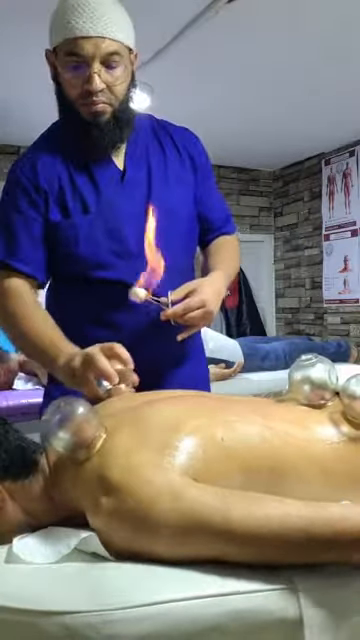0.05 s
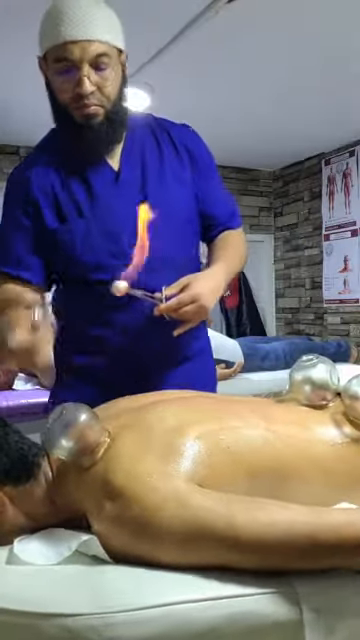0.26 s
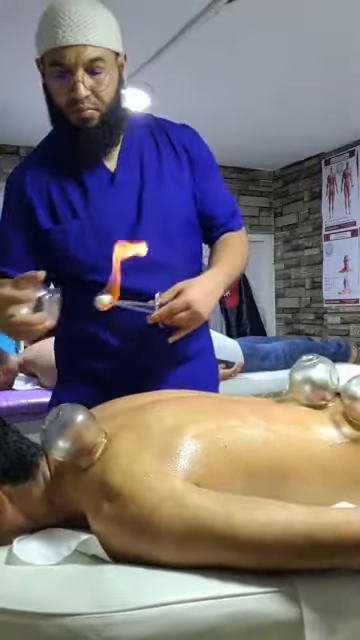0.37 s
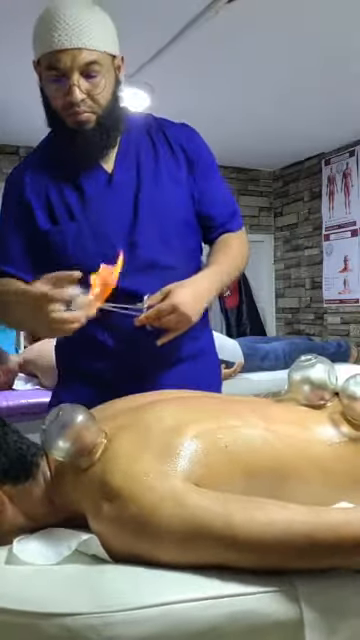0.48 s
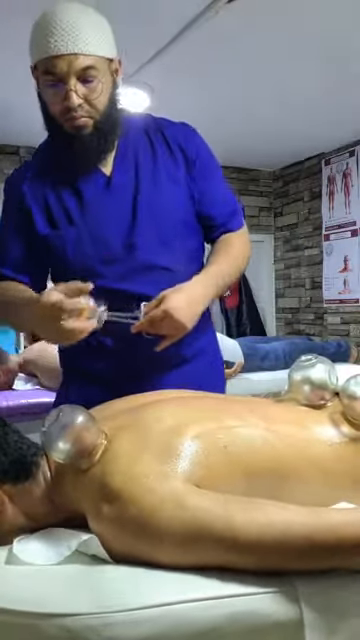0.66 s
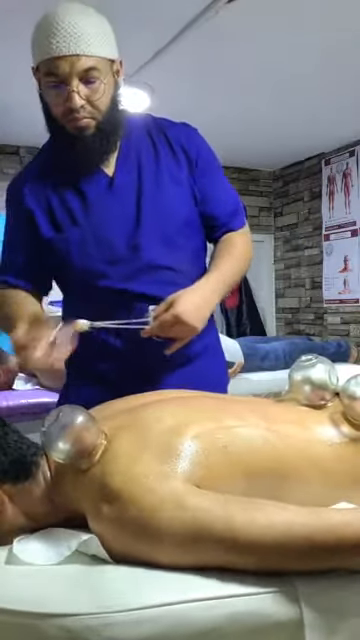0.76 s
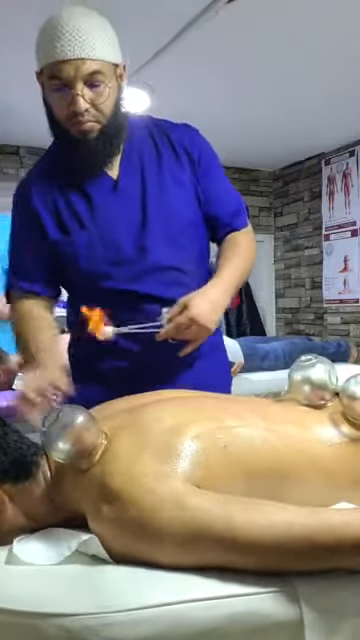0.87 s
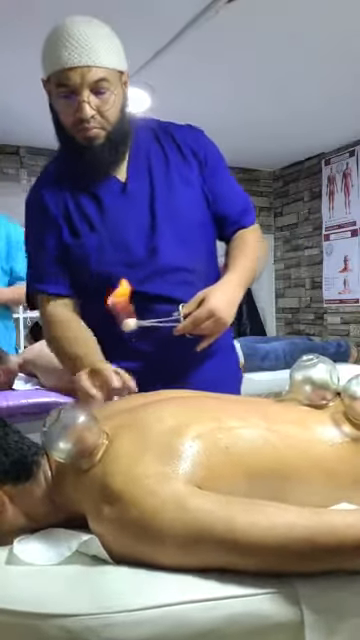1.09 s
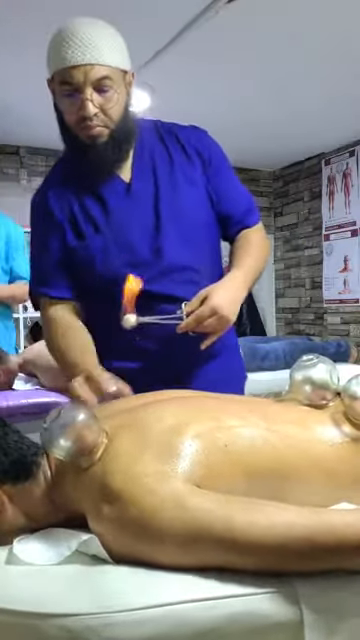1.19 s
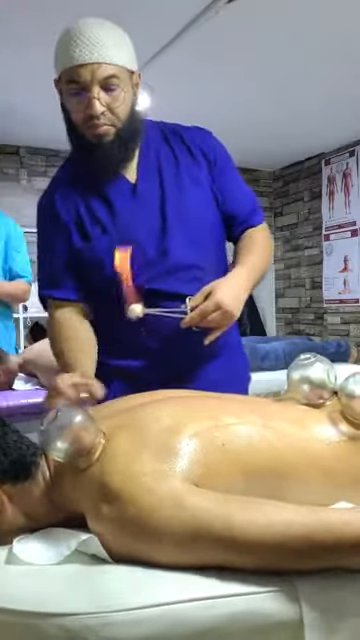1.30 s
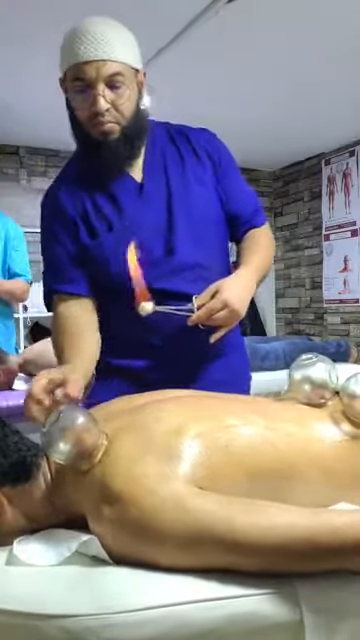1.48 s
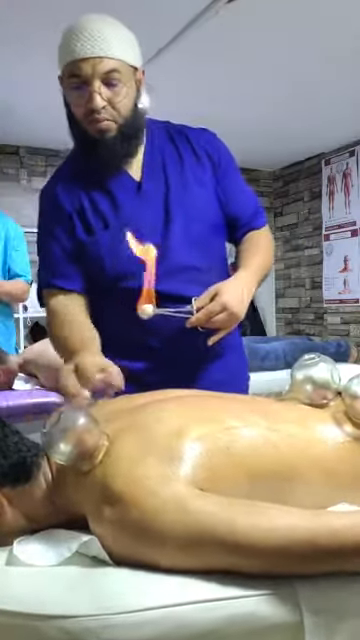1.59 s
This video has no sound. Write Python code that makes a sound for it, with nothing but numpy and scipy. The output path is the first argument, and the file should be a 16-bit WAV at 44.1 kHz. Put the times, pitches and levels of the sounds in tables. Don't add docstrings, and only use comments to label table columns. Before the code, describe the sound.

Suction cup released from skin: short airy pop with a quick rising note, then a tiny bright clink

```python
import sys
import numpy as np
from scipy import signal
from scipy.fft import rfft, irfft
from scipy.io import wavfile
from scipy.ndimage import uniform_filter1d

SR = 44100
rng = np.random.default_rng(int(sys.argv[2]) if len(sys.argv) > 2 else 0)


def convert_level_to_amplitude(level_db):
    exponent = np.asarray(level_db, float) / 20
    return 10 ** exponent


def pcm_store(signal):
    levels = np.round(np.clip(np.atleast_2d(signal), -1, 1) * 32767)
    wavfile.write(sys.argv[1], SR, levels.astype(np.int16).T)


N = 72765
T = np.arange(N) / SR
HZ = np.fft.rfftfreq(N, 1 / SR)

# delay/s, left level/dB, right level/dB
ECHOES = [
    (.0055, -14.5, -15),
    (.011, -3, -20),
    (.0165, -14, -4.5),
    (.021, -7, -6),
    (.03, -9.5, -8),
    (.049, -14, -10),
    (.058, -17.5, -7.5),
]
# f/Hz, T60/s
ROOM_T60 = [(60, 0.2), (200, 0.45), (600, .27), (1500, 0.24), (5000, 0.26), (12000, .22)]
# f/Hz, level/dB, T60/s
ROOM_MODES = [(66, -9, .6), (172, 1, .25), (221, -3, .38), (279, -3, .26), (382, -6, .22), (417, -6, .26),
              (560, -5, .27)]
# t/s, level/dB
ROOM_TONE_LEVEL = [(0.0, -57.5), (0.196, -54), (0.326, -47), (0.386, -52.5), (0.67, -71.5), (0.978, -76.5),
                   (1.138, -80), (1.388, -88), (1.65, -68)]
# f/Hz, level/dB
ROOM_TONE_COLOUR = [(15, -32.5), (25, -11), (63, -4.5), (190, -17), (427, -27), (503, -17.5), (1400, -35),
                    (8140, -40), (16000, -59)]
# t/s, level/dB, f/Hz
LOW_THROBS = [(0, -57, 64), (0.071, -49, 64), (0.142, -54, 66), (0.212, -32.5, 70), (0.272, -31.5, 67),
              (0.357, -37.5, 60), (.435, -58.5, 67), (0.512, -48, 66), (0.611, -48.5, 67),
              (0.687, -51, 65), (0.811, -55, 59), (.925, -45, 60), (1.029, -44, 70),
              (1.072, -47.5, 66.85), (1.14, -49.5, 64), (1.199, -51, 57.6), (1.28, -51, 61.7),
              (1.38, -64.5, 57.7), (1.478, -49.5, 61.3), (1.535, -44, 64.63), (1.619, -49, 55)]
# f/Hz, level/dB
CLOTH_COLOUR = [(200, -34), (500, -15.5), (920, -13.5), (1150, -5), (1730, -2), (8100, -9.5), (10000, -18),
                (15500, -21.5)]
# peak t/s, level/dB, rise/s, fall/s, tilt/(dB per octave)
RUSTLES = [(.0, -77, .01, 0.064, -2.5), (0.058, -48.5, 0.0026, 0.03, 5), (0.156, -42, 0.0014, 0.1, 1.5),
           (0.401, -48.5, 0.0028, 0.035, 2.5), (.44, -40.5, 0.027, 0.027, -4),
           (0.568, -56.5, 0.00245, 0.051, 7), (.632, -46, 0.0057, 0.038, -3.5), (.625, -60, .003, .03, 5),
           (.92, -79.5, 0.018, 0.041, -20.5), (1.15, -71.5, 0.06163, .1, 0.5),
           (1.37, -57.5, 0.0679, 0.079, -0.5), (1.442, -49, 0.06, 0.083, 0.5),
           (1.508, -51, 0.099, 0.064, -0.5), (1.452, -56, 0.0011, 0.0037, 15)]
# t/s, level/dB, contact/s
THUDS = [(.05, -41, .003), (0.299, -38.5, 0.0051), (0.601, -46.5, 0.0038), (0.672, -50.5, .003),
         (.885, -56, 0.0024), (.915, -48.5, .0012), (0.9978, -31, 0.0016), (1.011, -31, .0024),
         (1.023, -35.5, .0024), (1.095, -39.5, .0024), (1.52, -56, 0.0017)]
# f/Hz, level/dB, T60/s
TONGS_MODES = [(7378, 0, .12), (7390, -16.5, .2), (7760, -12.5, 0.084), (8060, -14, 0.069),
               (6640, -19, 0.024), (887, -18.5, 0.1)]
# f/Hz, level/dB, T60/s
GLASS_MODES = [(2393, -5, .15), (3891, -7.5, .17), (5130, -6, .19), (5787, -3, 0.11), (6608, -8, 0.29),
               (7070, -4.5, 0.26), (7327, -2.5, 0.15), (8300, -11.5, .25)]
# f/Hz, width/Hz, level/dB
JET_RESONANCES = [(1390, 380, -5.5), (2454, 210, 0), (3544, 230, -8.5), (5132, 640, -0.5), (5900, 210, -2),
                  (7300, 640, -5), (8700, 540, 0), (10050, 1200, -11.5), (12152, 800, -6.5),
                  (14500, 1800, -13.5)]

ALIKE_HZ = 270
ROOM_BASS_HZ = 209.9
TICK_S = .6185
SEAL_OPENS_S, POP_S, NOTE_S = .195, .2040, .2071


def curve(table, x, log=False):
    points = np.array(table, float)
    if log:
        return np.interp(np.log(x + 1), np.log(points[:, 0]), points[:, 1])
    return np.interp(x, points[:, 0], points[:, 1])


def unit(x):
    return x / np.sqrt(np.mean(x ** 2))


def noise(gain):
    mid, side = rfft(rng.standard_normal((2, N)))
    side = side * HZ ** 4 / (HZ ** 4 + ALIKE_HZ ** 4)
    return unit(irfft(np.array([mid + side, mid - side]) * gain, N))


def peak(hz, width):
    return 1 / np.hypot(1, (HZ - hz) / (width / 2))


def fade(t0, t60):
    return (T >= t0) * convert_level_to_amplitude(-60 * np.clip(T - t0, 0, None) / t60)


def swell(t0, rise, fall):
    return np.exp(np.where(T < t0, (T - t0) / rise, (t0 - T) / fall))


def ring(modes, t0):
    return sum(convert_level_to_amplitude(db) * fade(t0, t60) * np.sin(2 * np.pi * hz * (T - t0)) for hz, db, t60 in modes)


def walk(rate):
    width = int(SR / rate)
    once = uniform_filter1d(rng.standard_normal(N), width)
    return unit(uniform_filter1d(once, width))


def pan(db):
    return convert_level_to_amplitude(np.array([[db / 2], [-db / 2]]))


def room():
    tail = 0
    for hz in 60 * 2 ** np.arange(0, 8.5, .75):
        weight = np.sqrt(hz) / (1 + (ROOM_BASS_HZ / hz) ** 2)
        tail = tail + noise(peak(hz, hz / 2) ** 2) * weight * fade(0, curve(ROOM_T60, hz, log=True))
    tail = tail * (1 - np.exp(-T / .011))
    tail = convert_level_to_amplitude(1) * tail / np.sqrt(np.sum(tail ** 2) / 2)
    tail = tail + convert_level_to_amplitude(-31.5) * ring(ROOM_MODES, 0) / 10
    spectrum = rfft(tail)
    for lag, left_db, right_db in ECHOES:
        gain = convert_level_to_amplitude(np.array([[left_db], [right_db]]))
        alike = (gain.mean() - gain) * peak(0, 2 * ALIKE_HZ) ** 2
        lost_bass = gain.mean() * peak(0, 2 * ROOM_BASS_HZ) ** 2
        spectrum = spectrum + (gain + alike - lost_bass) * np.exp(-2j * np.pi * HZ * lag)
    return spectrum


def room_tone():
    colour = convert_level_to_amplitude(curve(ROOM_TONE_COLOUR, HZ, log=True))
    middle = colour[(HZ > 250) & (HZ < 1000)]
    share = np.sqrt(np.sum(colour ** 2) / np.sum(middle ** 2))
    return noise(colour) * share * convert_level_to_amplitude(curve(ROOM_TONE_LEVEL, T))


def flame():
    throbs = 0
    for t, db, hz in LOW_THROBS:
        bump = np.exp(-.5 * ((T - t) / .018) ** 2)
        throbs = throbs + convert_level_to_amplitude(db + 3.5) * bump * np.sin(2 * np.pi * hz * (T - t))
    colour = peak(64, 14) + convert_level_to_amplitude(-7) * peak(167, 71) ** 2
    return throbs + noise(colour * peak(0, 550) ** 2) * convert_level_to_amplitude(-62)


def flame_puff():
    return noise(peak(880, 260) ** 2) * convert_level_to_amplitude(-54) * swell(.57 + .0027, .0021, .3 / np.log(1000))


def rustles():
    out = 0
    for t, db, rise, fall, tilt_db in RUSTLES:
        colour_db = curve(CLOTH_COLOUR, HZ, log=True) + tilt_db * np.log2((HZ + 100) / 3000)
        grain_db = 1.5 * walk(300)
        out = out + noise(convert_level_to_amplitude(colour_db)) * convert_level_to_amplitude(db + grain_db) * swell(t, rise, fall)
    return out


def thuds():
    out = 0
    for t, db, contact in THUDS:
        x = (T - t - contact) / contact
        out = out + convert_level_to_amplitude(db) * x * 2 * np.exp(-2 * x ** 2)
    return out


def tongs():
    crack = noise(peak(2500, 9000) ** 2)[0] * fade(TICK_S, .014)
    bounce = (T > .624) * ring(TONGS_MODES[:1], TICK_S)
    steel = ring(TONGS_MODES, TICK_S) + convert_level_to_amplitude(-2.5) * bounce
    return steel * convert_level_to_amplitude(-27.5 + 2 * walk(200)), crack * convert_level_to_amplitude(-38)


def cup_note():
    low_hz, high_hz, rise_s = 438.5, 803.4, .008
    attack_s, hold_s, t60_s = .0017, .014, .024
    after = np.clip(T - NOTE_S, 0, None)
    hz = high_hz - (high_hz - low_hz) * np.exp(-after / rise_s)
    hold_end = NOTE_S + hold_s
    envelope = np.maximum(fade(hold_end, t60_s), T < hold_end) * (1 - np.exp(-after / attack_s))
    return convert_level_to_amplitude(-6.5) * envelope * np.sin(2 * np.pi * np.cumsum(hz * (T >= NOTE_S)) / SR)


def cup_release():
    suck_s = .0008
    push = convert_level_to_amplitude(-11) * swell(POP_S, .0022, .0004)
    suck = convert_level_to_amplitude(-8) * np.exp(-((T - POP_S - suck_s) / suck_s) ** 2 * 2)
    peel = noise(peak(600, 600) ** 2)[0] * convert_level_to_amplitude(-33) * (T > SEAL_OPENS_S) * (T < POP_S)
    return uniform_filter1d(push - suck, size=12) + peel


def cup_jet():
    colour = convert_level_to_amplitude(-20.5) * peak(7040, 11000) ** 2
    for hz, width, db in JET_RESONANCES:
        colour = colour + convert_level_to_amplitude(db) * peak(hz, width) ** 2
    jet = noise(colour)[0] * convert_level_to_amplitude(-15.5 + 2 * walk(600))
    jet = jet * (T > SEAL_OPENS_S) * swell(POP_S, .0062, .04 / np.log(1000))
    return jet + convert_level_to_amplitude(-38) * ring(GLASS_MODES, POP_S)


def scene():
    pop = cup_note() + cup_release()
    jet = cup_jet()
    tick, crack = tongs()
    thud = thuds()
    send = pop + convert_level_to_amplitude(-3.5) * jet + convert_level_to_amplitude(-12.5) * tick + convert_level_to_amplitude(1.5) * crack + thud
    close = pop + jet * pan(-5.5) + (tick + crack) * pan(-6.5) + thud
    wet = irfft(rfft(send) * room(), N)
    return close + wet + flame_puff() + rustles() + flame() + room_tone()


def band_limit(x):
    return signal.sosfilt(signal.butter(12, 16300, fs=SR, output="sos"), x)


def record(dry):
    port_lag_s, limit = .0003, .95
    mix = np.array([np.roll(dry[0], int(port_lag_s * SR)), dry[1]])
    mix = irfft(rfft(mix) * (1 - .62 * peak(9378, 360) ** 2), N)
    mix = signal.sosfiltfilt(signal.butter(2, 45, "high", fs=SR, output="sos"), mix)
    level = mix / limit
    mix = limit * np.tanh(level * (1 + level ** 2 / 3))
    mix = signal.sosfilt(signal.ellip(8, .2, 70, 15900, fs=SR, output="sos"), mix)
    return band_limit(mix)


dry = scene()
out = record(dry)
pcm_store(out)
```